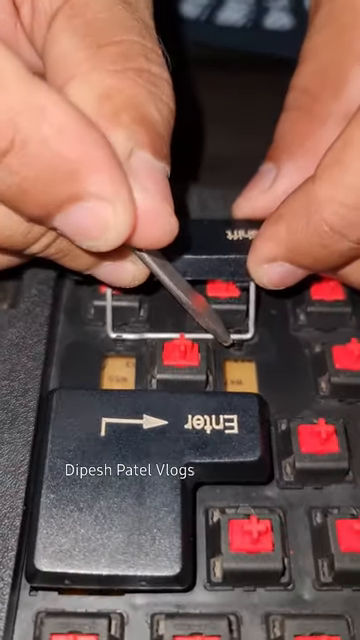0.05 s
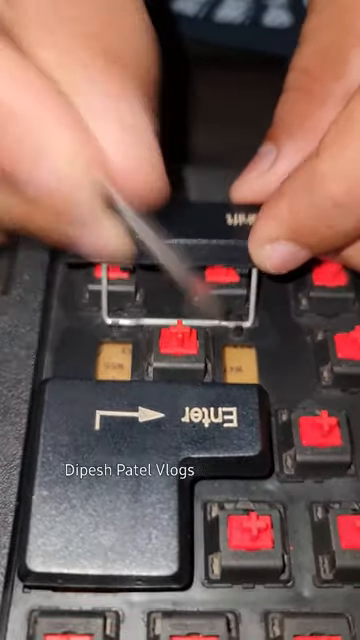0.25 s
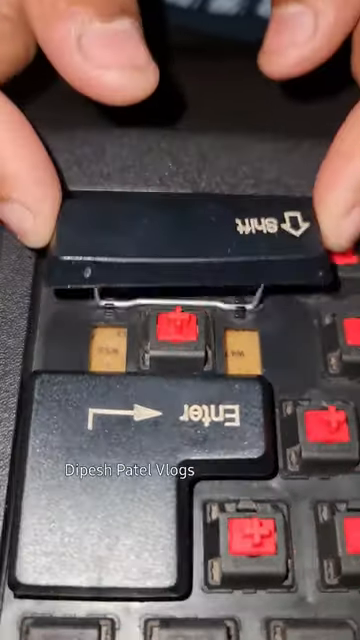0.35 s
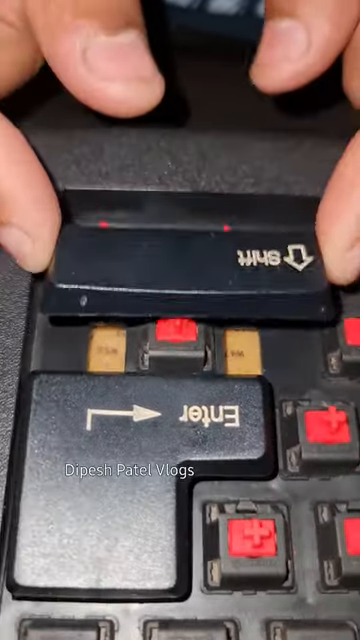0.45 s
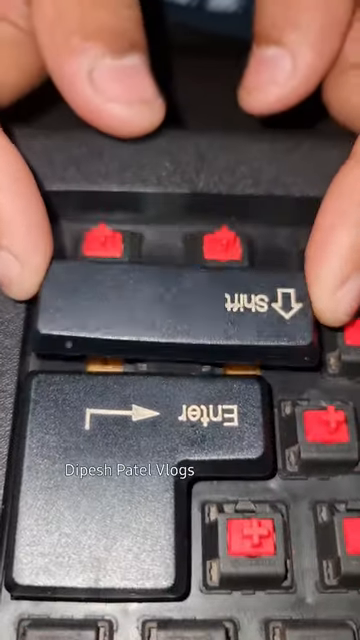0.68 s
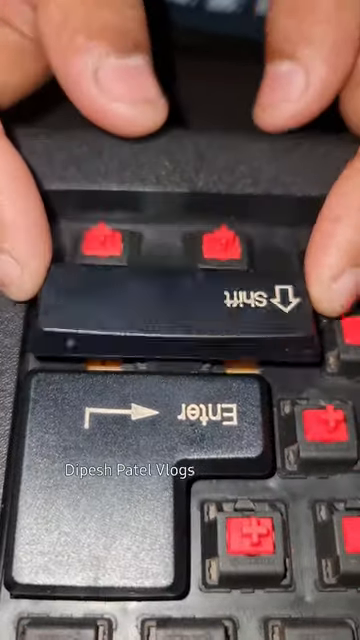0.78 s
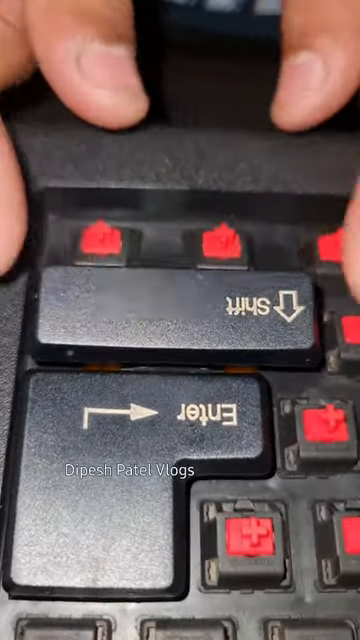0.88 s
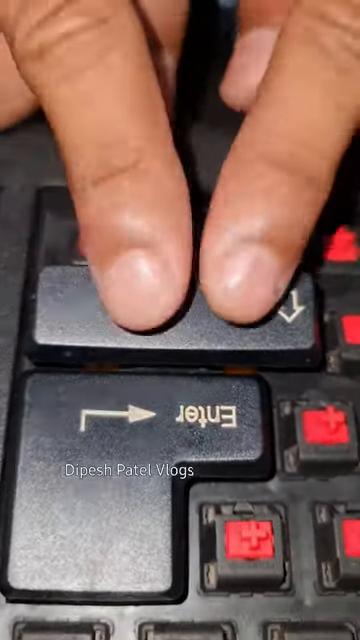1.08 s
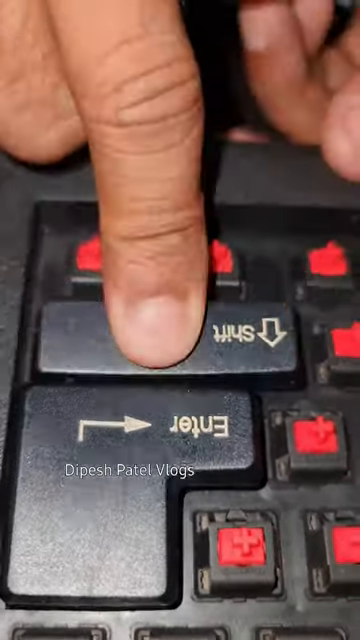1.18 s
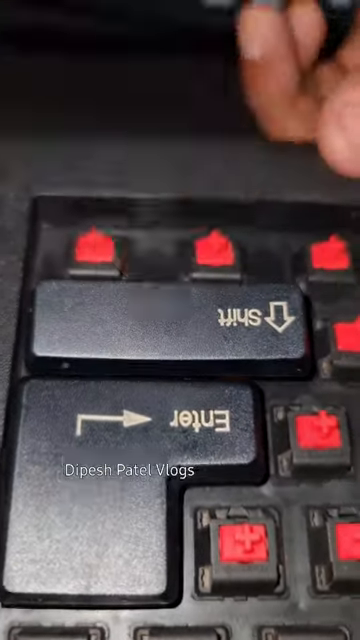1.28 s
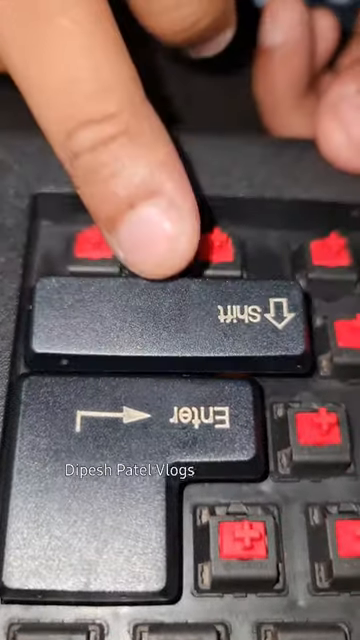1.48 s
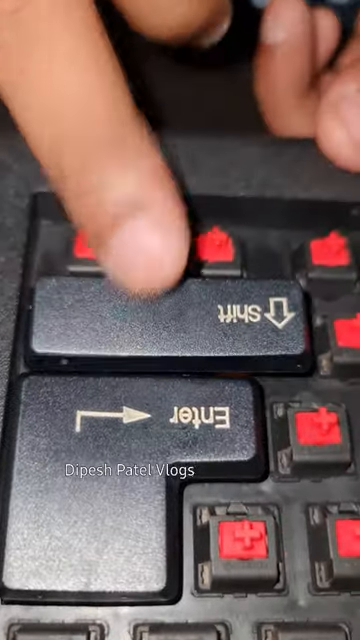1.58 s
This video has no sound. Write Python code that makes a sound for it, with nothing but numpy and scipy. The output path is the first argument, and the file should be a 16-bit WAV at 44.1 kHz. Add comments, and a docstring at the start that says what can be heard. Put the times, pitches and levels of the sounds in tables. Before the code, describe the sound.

Two sharp clicks as a wire and a keycap snap into a mechanical keyboard.

```python
"""A mechanical keyboard on a desk, close to two microphone ports, in a small room with a steady fan-like hum.
At 0.2 s a small screwdriver snaps a stabilizer wire into its clip; wire, clip and case ring, and the
room answers. A wide plastic keycap then scrapes, squeaks faintly and ticks as it is lined up. From
about 1.25 s fingers press it home with soft bumps, and at 1.38 s it seats with one sharp click."""
import sys
import numpy as np
from scipy import signal
from scipy.fft import rfft, irfft, next_fast_len
from scipy.io import wavfile

SR = 44100
rng = np.random.default_rng(int(sys.argv[2]) if len(sys.argv) > 2 else 0)


def transcribe(signal):
    """Save signal, clipped to [-1, 1], as a 16-bit WAV file at the path in sys.argv[1]."""
    frames = np.atleast_2d(signal).T
    limited = np.clip(frames, -1, 1)
    pcm = np.round(limited * 32767).astype(np.int16)
    wavfile.write(sys.argv[1], SR, pcm)


N = 72765

# room hum, the mid signal's spectrum (frequency [Hz], relative level [dB])
HUM_COLOUR = [(15, -58), (25, -13), (70, -32.5), (120, -1.5), (140, -4.5), (180, -22.5), (270, -17.5),
              (300, -9.5), (354, -2.5), (394, -3), (427, -10), (516, -6.5), (591, -15), (677, -9.5),
              (796, -5.5), (1040, -14), (1260, -12), (1560, -18.5), (2610, -16.5), (3250, -25), (3900, -23),
              (5000, -33.5), (7000, -37.5), (8300, -34.5), (9300, -54), (14000, -49), (15500, -72)]
# its stereo width (frequency [Hz], side over mid [dB])
HUM_SIDE = [(60, -9), (130, -8.5), (290, -17.5), (640, 3), (1410, 1.5), (3100, 4.5), (6820, 0.5),
            (15000, 0)]
# its lean to one port (frequency [Hz], left over right [dB])
HUM_BALANCE = [(60, -1.5), (150, 1.5), (380, -6.5), (950, 2), (2380, -5), (5980, -3.5), (15000, 1.5)]
# its slight drift (time [s], level [dB])
HUM_LEVEL = [(0, -47.5), (.35, -47), (.7, -48), (1.1, -47), (1.65, -47.5)]

# rumble of the hands on the case (time [s], level [dB])
RUMBLE_LEVEL = [(0, -54.5), (.18, -53), (.24, -56), (0.361, -47), (.46, -55.5), (.49, -75), (.54, -53),
                (.65, -55), (.72, -59.5), (1.235, -78), (1.26, -47.5), (1.34, -37.5), (1.42, -44.5),
                (1.465, -44.5), (1.49, -52), (1.65, -61)]
# its spectrum (frequency [Hz], relative level [dB])
RUMBLE_COLOUR = [(25, -23), (50, -8), (70, 9.5), (125, 11.5), (200, 0.5), (280, -14), (600, -67.5)]
# dull hand bumps (time [s], peak [dB], pitch [Hz], left over right [dB], right port lag [s])
BUMPS = [(0.208, -35, 147.5, 17.5, .001), (1.2677, -27, 135, -8.5, .002), (1.2957, -21.5, 152, 2.5, .0002),
         (1.331, -39.5, 157.2, 29, .0005), (1.349, -35, 124.6, -20, .001), (1.364, -40.5, 145.3, -16, .003),
         (1.392, -35, 147, -7, .0005), (1.411, -40, 148, 25, .001), (1.432, -40, 135, 22, .001),
         (1.459, -36, 116, -3, .001)]
# soft knocks that ring the case (time [s], level [dB])
CASE_KNOCKS = [(.229, -26.5), (0.336, -48), (.36, -41), (1.386, -40)]

# rubbing plastic (middle time [s], half length [s], pitch [Hz], level [dB])
SQUEAKS = [(0.427, 0.026, 3600, -56.5), (0.522, 0.019, 1857, -50), (0.63, 0.009, 2720, -50.5)]
# the cap sliding over wire and switch (middle time [s], half length [s], level [dB])
SCRAPES = [(0.413, .025, -61.5), (0.472, 0.015, -50), (0.514, 0.023, -50), (0.653, 0.066, -61.5),
           (0.908, 0.0091, -49), (1.358, 0.016, -42.5)]
# friction hiss (frequency [Hz], relative level [dB])
SCRAPE_COLOUR = [(500, -22), (1300, 2.5), (1900, 1), (3000, -3.5), (4000, -3.5), (6500, -9.5),
                 (10000, -18.5), (16000, -33.5)]
# light contacts of the cap (time [s], level [dB], treble tilt [dB/octave], relative ring level [dB])
TICKS = [(.3688, -46, 1, -12), (.3762, -52, 2, -12), (.4632, -49, 1, -12), (.4675, -46, 1, -12),
         (.4755, -39, 3, -14), (.4828, -34, 1, -14), (.5075, -48, 0, -12), (.5125, -40, 0, -14),
         (.5305, -50, -1, -12), (.6055, -51, 0, -12), (.6892, -54, 0, -12), (.7920, -37, -1, 2),
         (.8325, -49, 1, -12), (.8402, -52, 3, -12), (.8955, -45, -2, -3), (.9035, -50, 2, -12),
         (.9390, -40, 1, -6), (.9403, -39, 2, -8), (1.0438, -50, 3, -12)]
# spectrum of ticks and slips (frequency [Hz], relative level [dB])
TICK_COLOUR = [(500, -17), (1900, -7), (3200, 6), (4150, 5), (5000, 2.5), (6400, 3.5), (7300, -4),
               (10000, -4.5), (12500, -13.5), (15000, -20.5), (16500, -34)]

# the cap seating on its stem (time [s], relative level [dB])
CAP_CONTACTS = [(1.3744, -16), (1.3760, 0), (1.3775, -13)]
# ring of cap and switch (frequency [Hz], level [dB], t60 [s], left over right [dB])
CAP_MODES = [(383.3, -36, 0.16, -2.5), (682, -27.5, 0.038, -7.5), (750, -31, 0.023, -8),
             (1333, -31.5, .025, 11), (1630, -47, 0.015, -1), (1983, -34.5, 0.029, 26),
             (2620, -32.5, 0.014, 25), (3660, -24, 0.019, 2.5), (4790, -15.5, 0.0038, 9.5),
             (5700, -34, 0.027, -10), (6720, -13.5, 0.014, -3), (8840, -23, 0.0063, -4.5),
             (9900, -20, 0.011, -6.5)]
# the cap's direct crack (frequency [Hz], relative level [dB])
CAP_CRACK = [(100, -41), (350, -23), (650, -25), (1500, -13), (3200, -5), (5300, 5), (7500, -7),
             (10000, -1.5), (12500, -6), (16500, -7)]
# the room's answer to the cap (frequency [Hz], relative level [dB])
CAP_ROOM = [(250, -16), (390, 1), (500, -8), (720, 5.5), (980, -29), (1300, -3), (1600, -14), (2000, -6.5),
            (3000, -17.5), (5500, -7.5), (8000, -14), (13500, -26), (15500, -49)]

# the wire striking its clip (time [s], relative level [dB])
WIRE_CONTACTS = [(.20565, -3), (.2062, 0)]
# ring of wire, clip and case (frequency [Hz], level [dB], t60 [s], left over right [dB])
WIRE_MODES = [(371, -30, 0.093, 0), (616, -18.5, 0.025, 10), (783, -24, 0.05, -13.5),
              (1460, -27.5, 0.037, 6), (2202, -35, 0.02, -9), (2340, -22, 0.021, -10),
              (2583, -13.5, 0.022, 9.5), (3490, -22, 0.017, -10.5), (3870, -15, 0.013, -19.5),
              (4004, -29.5, 0.0233, -22), (5670, -18, 0.017, -18), (7700, -19.5, 0.006, -17.5),
              (9500, -28.5, 0.0069, -3), (10900, -23, 0.0085, 5.5)]
# the wire's direct crack (frequency [Hz], relative level [dB])
WIRE_CRACK = [(60, -33), (200, -26), (400, -19.5), (1100, -2.5), (2400, 13.5), (4500, 4.5), (7000, -17.5),
              (10500, 3.5), (13000, -5.5), (16500, -7.5)]
# the room's answer to the wire (frequency [Hz], relative level [dB])
WIRE_ROOM = [(59, -51), (100, -19), (219, -21), (389, 5), (513, -15), (1330, -17.5), (1610, -9),
             (1720, -34), (2040, -9.5), (3620, -19), (11900, -32.5), (15000, -36.5), (16000, -73)]

PORT_LAG_S = 0.00029  # the right port hears the keys later
CASE_HZ, CASE_T60_S = 376, 0.062
SQUEAK_WIDTH = .06  # share of the pitch
SLIPS_PER_S, CRACKLE_DB = 400, -12  # crackle level is relative to the slide's hiss
TICK_RING_HZ, TICK_ROOM_DB = 4120, -24
CLICK_ATTACK_S, CLICK_LOW_CUT_HZ = .00004, 170
PEAK_CEILING, TOP_HZ = .85, 17100


def amp(db):
    """Decibels to gain."""
    return 10 ** (np.asarray(db) / 20)


def unit(x):
    """Scale to rms 1."""
    return x / np.sqrt(np.mean(x ** 2) + 1e-20)


def along(points, hz):
    """(frequency, value) points read on a log axis."""
    freqs, values = np.transpose(points)
    return np.interp(np.log(hz + 1), np.log(freqs + 1), values)


def clock():
    """The time of each sample."""
    return np.arange(N) / SR


def fader(points):
    """Gain that follows (time, level) points."""
    return amp(np.interp(clock(), *np.transpose(points)))


def pan(db):
    """Left and right gains for a level difference."""
    return amp(np.array([[.5], [-.5]]) * db)


def since(start, lag=PORT_LAG_S):
    """Time since a contact reached each port."""
    return np.maximum(clock() - start - np.array([[0], [lag]]), 0)


def decay(t, attack, t60):
    """A quick rise and an exponential fall."""
    return (1 - np.exp(-t / attack)) * np.exp(-np.minimum(np.log(1000) * t / t60, 50))


def bell(x, half_width):
    """A bell curve that peaks at x = 0."""
    return np.exp(-(x / half_width) ** 2)


def filtered(x, response):
    """x through a complex frequency response."""
    size = next_fast_len(N + SR // 2)
    return irfft(rfft(x, size) * response(np.fft.rfftfreq(size, 1 / SR)), size)[..., :N]


def causal(x, colour):
    """x through a minimum-phase filter that keeps the power of white noise."""
    def response(hz):
        gain = unit(amp(along(colour, hz)))
        cepstrum = irfft(np.log(gain))
        cepstrum[1:len(cepstrum) // 2] *= 2
        cepstrum[len(cepstrum) // 2 + 1:] = 0
        return np.exp(rfft(cepstrum))
    return filtered(x, response)


def white():
    """White noise, unrelated between the ports."""
    return rng.standard_normal((2, N))


def noise(colour, tilt_db=0):
    """Coloured noise of rms 1, tilted by tilt_db per octave above 1 kHz."""
    def response(hz):
        octaves = np.log2(np.maximum(hz, 1000) / 1000)
        return amp(along(colour, hz) + tilt_db * octaves)
    return unit(filtered(white(), response))


def hum():
    """Room tone: steady fan-like noise in the room's resonances."""
    mid, side = filtered(white(), lambda hz: amp(along(HUM_COLOUR, hz)))
    side = filtered(side, lambda hz: amp(along(HUM_SIDE, hz)))
    ports = filtered(np.array([mid + side, mid - side]), lambda hz: pan(along(HUM_BALANCE, hz)))
    return unit(ports) * fader(HUM_LEVEL)


def room(start, colour, level_db, attack, t60, pan_db):
    """The diffuse answer of desk and walls to a click."""
    return amp(level_db) * pan(pan_db) * noise(colour) * decay(since(start), attack, t60)


def hands():
    """Hands on the case: soft low pushes of a cycle or two over a rumble."""
    out = noise(RUMBLE_COLOUR) * fader(RUMBLE_LEVEL)
    for middle, db, hz, side, lag in BUMPS:
        t = clock() - middle - np.array([[-lag / 2], [lag / 2]])
        out -= amp(db) * pan(side) * bell(t, half_width=0.0048) * np.cos(2 * np.pi * hz * t)
    return out


def case():
    """The hollow case rings briefly after each soft knock."""
    out = np.zeros((2, N))
    for start, db in CASE_KNOCKS:
        t = since(start)
        out += amp(db) * decay(t, attack=0.0048, t60=CASE_T60_S) * np.sin(2 * np.pi * CASE_HZ * t)
    return out


def squeaks():
    """Brief narrow rasps where plastic sticks and slips."""
    out = np.zeros((2, N))
    for middle, half, pitch, db in SQUEAKS:
        rasp = unit(filtered(white(), lambda hz: bell(hz / pitch - 1, SQUEAK_WIDTH)))
        out += amp(db) * rasp * bell(clock() - middle, half)
    return out


def scrapes():
    """Friction hiss and tiny slips swell and fade with each slide of the cap."""
    slips = (rng.random(N) < SLIPS_PER_S / SR) * rng.standard_normal(N)
    crackle = unit(causal(slips, TICK_COLOUR))
    strokes = sum(amp(db) * bell(clock() - middle, half) for middle, half, db in SCRAPES)
    return strokes * (noise(SCRAPE_COLOUR) + amp(CRACKLE_DB) * crackle)


def ticks():
    """Tiny plastic contacts up close: a dry crack, a short ring of the cap and a faint room tail."""
    out = np.zeros((2, N))
    for start, db, tilt, ring_db in TICKS:
        t = since(start)
        direct = decay(t, attack=0.00014, t60=.011)
        tail = amp(TICK_ROOM_DB) * decay(t, attack=.003, t60=0.13)
        crack = noise(TICK_COLOUR, tilt) * (direct + tail)
        ring = amp(ring_db) * decay(t, attack=0.00023, t60=.017) * np.cos(2 * np.pi * TICK_RING_HZ * t)
        out += amp(db) * (crack + ring)
    return out


def click(contacts, modes, colour, burst_db, burst_t60, spike_db, crack_pan_db, lag):
    """Each contact cracks with a spike and a noise burst; the hardest one sets the modes ringing."""
    port_time = clock() - np.array([[0], [lag]])
    spikes = sum(amp(db) * bell(port_time - start, 1 / SR) for start, db in contacts)
    bursts = sum(amp(db) * decay(since(start, lag), CLICK_ATTACK_S, burst_t60) for start, db in contacts)
    crack = causal(amp(burst_db) * bursts * white() + amp(spike_db) * spikes, colour)
    hardest_time, _ = max(contacts, key=lambda row: row[1])
    t = since(hardest_time, lag)
    ring = sum(amp(db) * pan(side) * decay(t, CLICK_ATTACK_S, t60) * np.cos(2 * np.pi * hz * t)
               for hz, db, t60, side in modes)
    return ring + pan(crack_pan_db) * crack


def low_cut(x):
    """A gentle high-pass that keeps the clicks free of low boom."""
    return signal.sosfilt(signal.butter(2, CLICK_LOW_CUT_HZ, "highpass", fs=SR, output="sos"), x)


def keycap():
    """The cap clicks onto its stem, close to the ports, with the room behind it."""
    direct = click(CAP_CONTACTS, CAP_MODES, CAP_CRACK,
                   burst_db=-11.5, burst_t60=.005, spike_db=0.5, crack_pan_db=4.5, lag=0.000207)
    tail = room(CAP_CONTACTS[1][0], CAP_ROOM, level_db=-25.5, attack=.001, t60=0.09, pan_db=-0.5)
    return low_cut(direct + tail)


def wire():
    """The stabilizer wire snaps into its clip, close to the ports, and the room answers."""
    direct = click(WIRE_CONTACTS, WIRE_MODES, WIRE_CRACK,
                   burst_db=-9.5, burst_t60=.006, spike_db=-2.5, crack_pan_db=3.5, lag=.0001)
    tail = room(WIRE_CONTACTS[-1][0], WIRE_ROOM, level_db=-20, attack=0.00103, t60=0.13, pan_db=-2)
    return low_cut(direct + tail)


def scene():
    """Everything at the two ports, from the room tone to the close clicks."""
    return hum() + hands() + case() + squeaks() + scrapes() + ticks() + keycap() + wire()


def record(dry):
    """The recorder rounds the highest peaks and keeps nothing above its band limit."""
    rounded = dry / (1 + np.abs(dry / PEAK_CEILING) ** 6) ** (1 / 6)
    return filtered(rounded, lambda hz: np.sin(np.pi / 2 * np.clip((TOP_HZ - hz) / 900, 0, 1)) ** 2)


dry = scene()
out = record(dry)
transcribe(out)
```